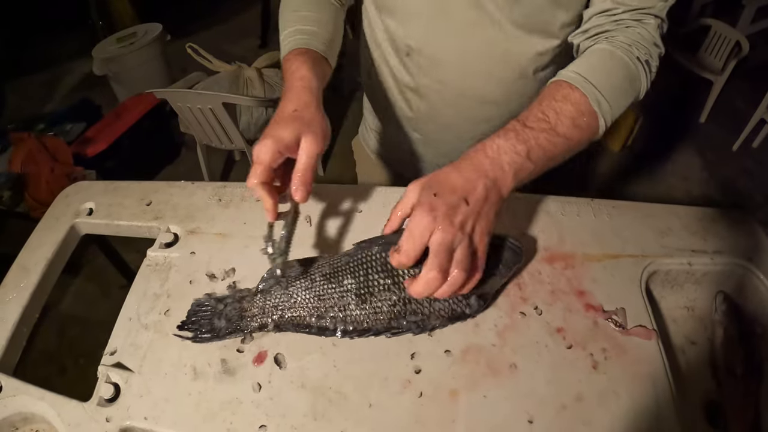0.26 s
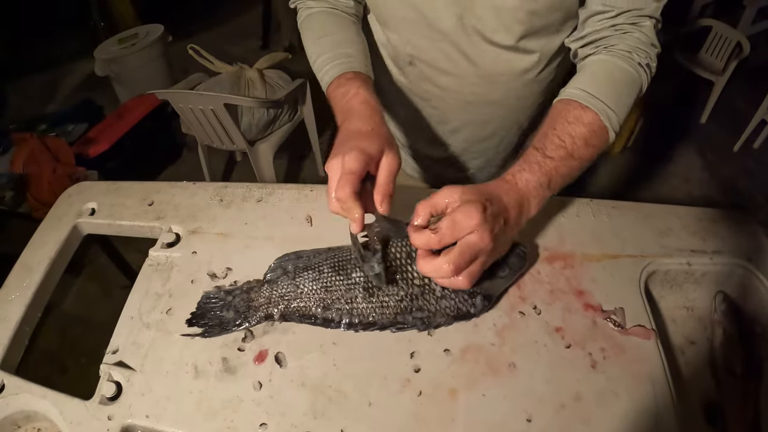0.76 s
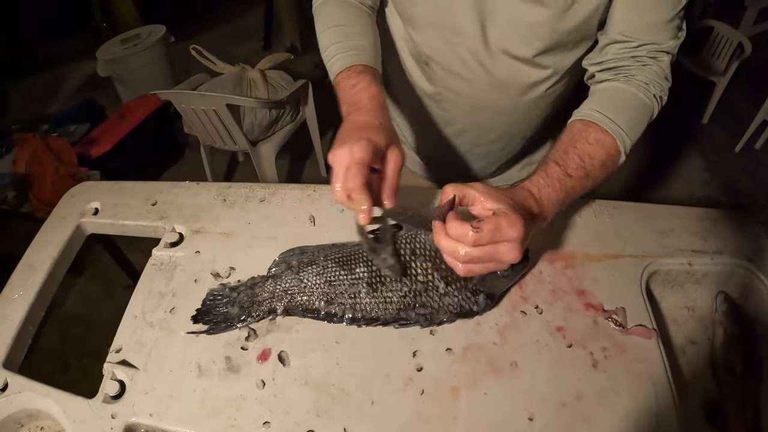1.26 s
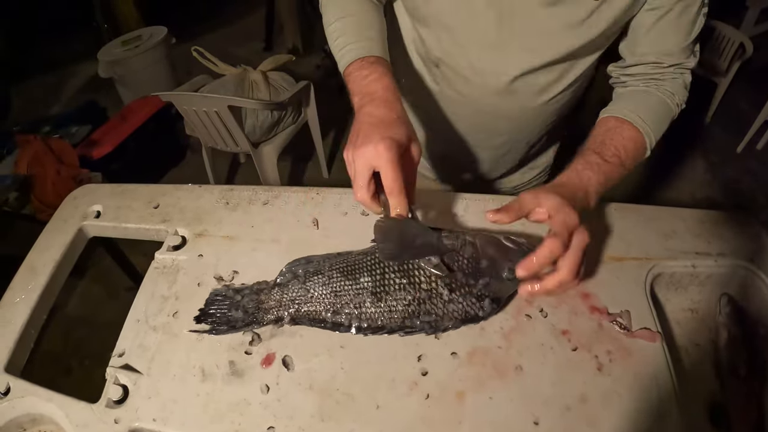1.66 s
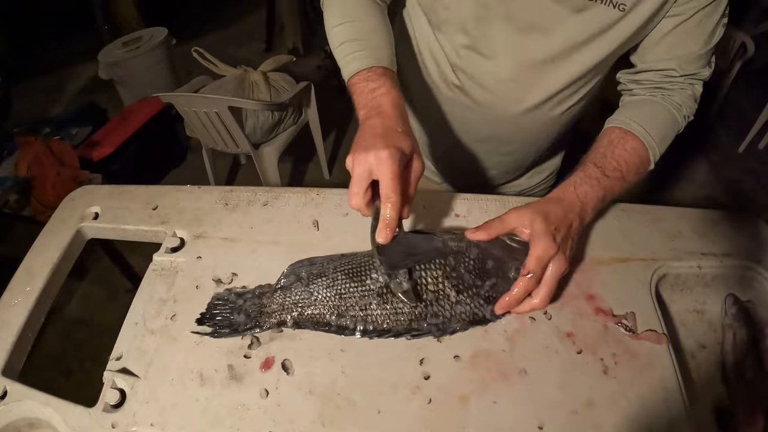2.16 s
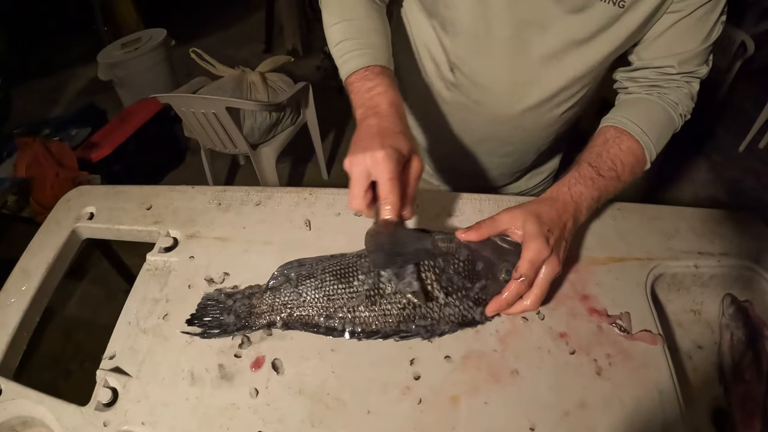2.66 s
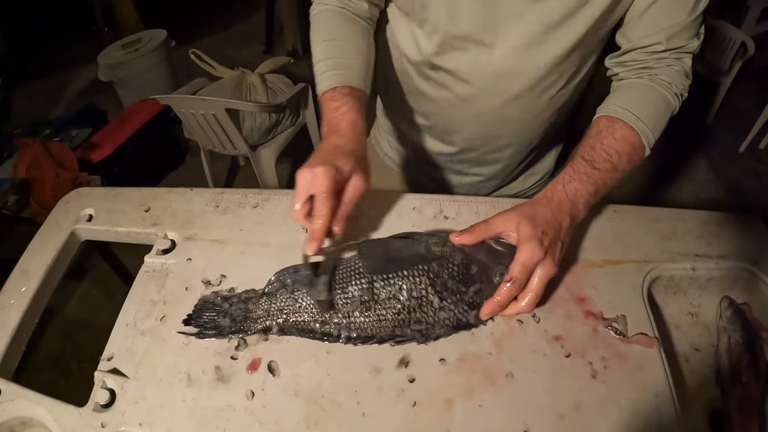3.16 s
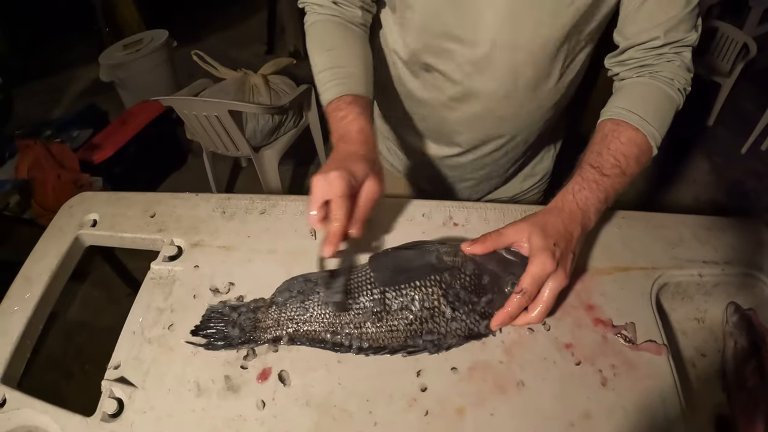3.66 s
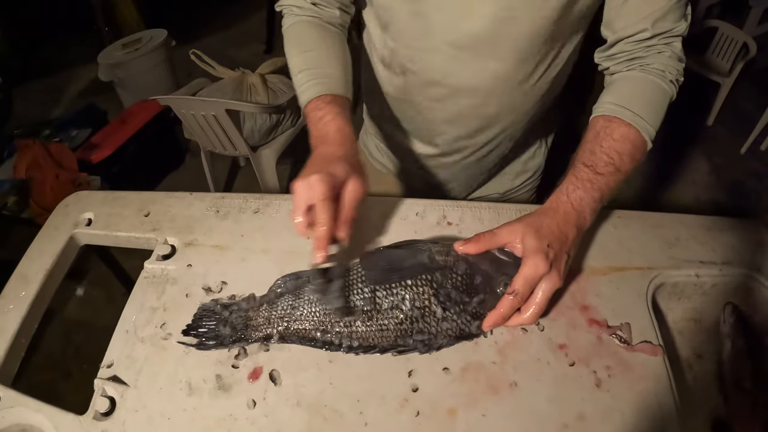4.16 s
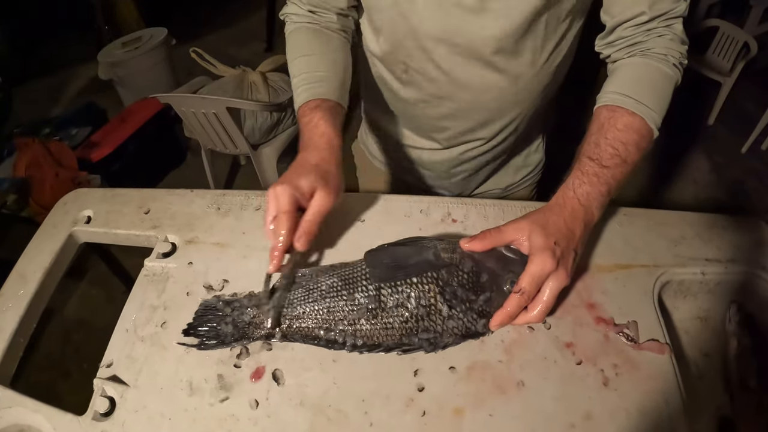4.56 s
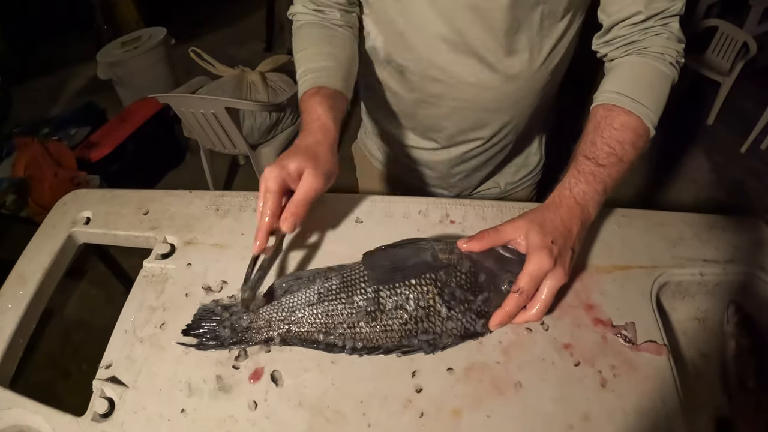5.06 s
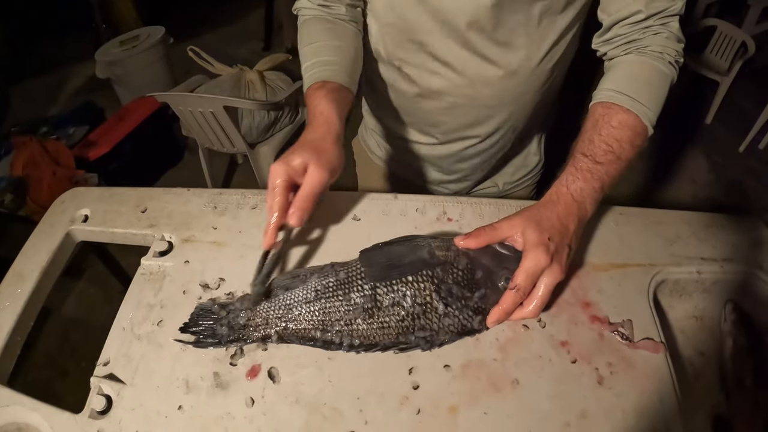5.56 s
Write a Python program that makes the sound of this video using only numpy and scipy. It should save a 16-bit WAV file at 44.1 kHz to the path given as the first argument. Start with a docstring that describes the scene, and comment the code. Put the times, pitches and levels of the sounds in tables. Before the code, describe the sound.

Close, gritty, ringing scrapes with clicking scales and hollow table thumps, sparse at first, then rapid back-and-forth, ending in separate harder strokes over a faint night hum.

```python
"""Rasping strokes to and fro: a toothed metal scaler rubs a fish on a hollow plastic table, close by, at night.
Friction grit rings the scaler's modes, scales snap loose in short clicks, and fine spray hisses over it.
Each stroke also drums the table through low and panel modes, with short reflections from table and clutter.
Behind lie a low hum that swells with the strokes, faint hiss and thin whistling bands of noise."""
import sys
import numpy as np
from scipy import signal
from scipy.fft import rfft, irfft, next_fast_len
from scipy.io import wavfile
from scipy.ndimage import uniform_filter1d

SR = 44100
rng = np.random.default_rng(int(sys.argv[2]) if len(sys.argv) > 2 else 0)


def store_pcm(level_fs):
    """Save levels as 16-bit WAV."""
    pcm = np.round(np.clip(level_fs, -1, 1) * 32767).astype(np.int16)
    wavfile.write(sys.argv[1], SR, np.atleast_2d(pcm).T)


def how_loud(loudness_db):
    """Turn decibels into a plain amplitude multiplier (0 dB gives 1, 20 dB gives 10)."""
    steps = np.asarray(loudness_db, float) / 20
    return 10 ** steps


N = 256662  # length [samples]
TIGHT_HZ = 2146  # a lowest scaler mode above this means a tight grip


def evened(x):
    """Scales to rms 1."""
    return x / np.sqrt(np.mean(x ** 2) + 1e-20)


def read(points, hz):
    """Reads a spectrum table on a log-frequency axis."""
    f, value = np.transpose(points)
    return np.interp(np.log(hz + 1), np.log(f + 1), value)


def filtered(x, order, edge_hz, kind):
    """Butterworth filter, run forward in time."""
    return signal.sosfilt(signal.butter(order, edge_hz, kind, fs=SR, output="sos"), x)


def wander(rate):
    """Slow random curve of rms about 1, with the given number of new values per second."""
    steps = int(N / SR * rate) + 2
    return np.interp(np.arange(N), np.linspace(0, N, steps), rng.standard_normal(steps)) * 1.22


def grit(per_s, spread_db):
    """Random clicks of either sign, most small and a few large, rms 1."""
    hit, size, sign = rng.random((3, N))
    height = how_loud(-spread_db * np.log(size + .004))
    return evened((hit < per_s / SR) * height * np.sign(sign - .5))


def resonate(x, hz, width):
    """A resonance of gain 1 that follows the curve hz: shift down to zero, smooth, shift back up."""
    turn = np.exp(2j * np.pi * np.cumsum(hz * np.ones(len(x))) / SR)
    r = np.exp(-np.pi * abs(width) / SR)
    return 2 * (turn * signal.lfilter([1 - r], [1, -r], x / turn)).real


def ring(x, modes, shifting_db=0., drift=0., favoured_hz=None, focus_db=0.):
    """Sum of modes, neighbours in opposite phase; each swells and drifts as the point of contact moves."""
    out = 0
    for k, (hz, width, db) in enumerate(modes):
        contact_db = shifting_db * wander(22)
        if favoured_hz is not None:  # modes near the favoured pitch are excited best
            contact_db += focus_db * np.exp(-(np.log(hz / favoured_hz) / 0.052) ** 2)
        moving_hz = hz * (1 + drift * wander(9))
        out = out + (-1) ** k * how_loud(db) * resonate(x * how_loud(contact_db), moving_hz, width)
    return out


def colour(points):
    """Causal (minimum-phase) click with the given spectrum."""
    log_gain = np.log(how_loud(read(points, abs(np.fft.fftfreq(2048, 1 / SR)))))
    return np.fft.ifft(np.exp(np.conj(signal.hilbert(log_gain)))).real[:512]


def stroke(t, row, manner):
    """All controls of one stroke: quick rise, sloping hold, fall and trail; the table is jolted on the way."""
    start, length, first_db, last_db, grip_hz, middle_db, upper_db, jolt_db = row
    ends, swell_db, push_at, knock_at, rise_db_per_s, knock_db = manner
    fall_db_per_s, trail_db, trail_db_per_s = 854, -9.5, 258  # a quick fall, then a slower trail
    relax = 0.65  # share of the tight grip that is let go by the end
    push_s, push_depth_db, knock_s, knock_depth_db = 0.049, -10.5, 0.03, -12.5  # jolt widths, drop away from them
    shallow_db_per_hz = -0.0289  # a tight grip bites less

    u = np.clip((t - start) / length, 0, 1)  # share of the stroke done
    past = np.maximum(t - start - length, 0)
    fall_db = np.maximum(-fall_db_per_s * past, np.minimum(trail_db - trail_db_per_s * past, 0))
    pressure_db = first_db + (last_db - first_db) * u + swell_db * np.sin(np.pi * u)
    pressure_db = pressure_db - rise_db_per_s * np.maximum(start - t, 0) + fall_db
    body_db, body_hz, teeth_db, teeth_hz, bite_db, spray_db = (a + (b - a) * u for a, b in ends)

    # outside the stroke the jolts weaken by half as many dB as the pressure
    weaker_db = np.minimum(pressure_db - min(first_db, last_db), 0) / 2
    off_push = 1 - np.exp(-((t - start - push_at * length) / push_s) ** 2)
    off_knock = 1 - np.exp(-((t - start - knock_at * length) / knock_s) ** 2)
    push_db = jolt_db + weaker_db + push_depth_db * off_push
    knock_db = jolt_db + weaker_db + knock_db + knock_depth_db * off_knock

    tight_hz = max(grip_hz - TIGHT_HZ, 0)
    return (pressure_db, grip_hz - relax * u * tight_hz, middle_db + body_db, body_hz, upper_db + teeth_db,
            teeth_hz, bite_db + shallow_db_per_hz * tight_hz, spray_db, push_db, knock_db)


def stroke_controls():
    """The hand: at every moment the stroke of greatest pressure sets all controls, smoothed over 5 ms."""
    # strokes of the scaler, all four tables: (start [s], length [s], pressure at start [dB], at end [dB],
    # lowest scaler mode [Hz], middle modes [dB], upper modes [dB], jolt of the table [dB])
    # against the lie of the scales
    against = [(0.0, 0.075, -18, -27, 2010, -3, -11, -28), (2.305, 0.06, -25, -20, 2060, -2.5, -7, -26.5),
               (2.6, 0.062, -19.5, -25.5, 2090, -0.5, -6, -25), (2.8, 0.06, -21, -24, 2050, -1.5, -8, -23),
               (3.09, 0.092, -23.5, -21.5, 2130, -0.5, -2.5, -23.5),
               (3.355, 0.089, -24, -22.5, 2090, -1.5, -4.5, -20.5),
               (3.578, 0.067, -27.5, -18.5, 2120, 2, -2.5, -21),
               (3.81, 0.061, -22.5, -24.5, 2080, 2, -3.5, -22),
               (4.037, .056, -20, -20, 2120, -2, -4, -26.5),
               (4.268, 0.075, -20.5, -20.5, 2060, -5, -5, -28.5),
               (4.387, 0.061, -31, -20.5, 2070, -2, -6.5, -33.5)]
    # single strokes that land hard, the scaler lifted back through the air in between
    lifted = [(4.732, 0.072, -12.5, -19.5, 2236, -3.5, -9.5, -24.5),
              (4.997, 0.096, -14, -24, 2320, -11.5, -11.5, -28.5),
              (5.268, 0.079, -13.5, -17.5, 2308, -14.5, -10.5, -28),
              (5.508, 0.1, -13, -24.5, 2250, -11.5, -10, -29.5),
              (5.778, 0.06, -20, -15.5, 2270, -17.5, -10.5, -28.5)]
    # strokes gliding back
    back = [(.135, 0.029, -21.5, -22.5, 2040, -5.5, -14, -41.5),
            (2.445, 0.087, -30.5, -27, 2090, 0.5, -10.5, -36.5),
            (2.71, 0.054, -27.5, -19.5, 2050, -1, -12, -31),
            (2.932, .12, -17.5, -24.5, 2107, -8.5, -8.5, -29),
            (3.235, 0.074, -15, -18, 2065, -2.5, -6.5, -27),
            (3.488, 0.057, -15.5, -18.5, 2100, -5.5, -3, -28.5),
            (3.7, 0.061, -17, -18, 2140, -2.5, -2, -27), (3.914, 0.08, -18.5, -24.5, 2066, -0.5, -4, -28.5),
            (4.148, 0.077, -16, -24.5, 2110, -5.5, -2.5, -31),
            (4.505, 0.082, -17, -21, 2090, -2.5, -2.5, -28.5),
            (4.59, 0.091, -32, -27, 2120, -6.5, -10.5, -35.5)]
    # light scuffs while the scaler rests or finds its place
    scuffs = [(.19, 0.11, -42, -49, 2010, -8, -13, -45), (.73, 0.06, -59, -49, 2100, 1, -4, -66),
              (.8, 0.021, -43, -37, 2040, -8, -5, -60), (.862, 0.0079, -32, -30, 2060, -4, -9, -47),
              (1.002, 0.2, -42.5, -34.5, 2150, -4.5, -8.5, -54),
              (1.27, 0.039, -37, -32.5, 2190, -9, -1.5, -43),
              (1.358, 0.0099, -14, -26, 2210, -10, -11, -43),
              (1.439, 0.011, -30, -32, 2150, -10.5, -6, -35), (1.472, 0.019, -31.5, -33.5, 2090, 7, 7, -29),
              (1.52, 0.13, -48, -40, 2000, 3, -9, -39.5), (1.6, 0.023, -34.5, -39, 2200, 3, -1, -40),
              (1.638, .016, -24, -22, 2220, -3.5, -12, -33), (1.768, 0.076, -46, -47, 2050, -8, -4.5, -42),
              (1.848, .15, -42, -28, 2050, 3.5, -4.5, -36), (2.05, 0.023, -41, -49, 2100, 3, -8, -40),
              (2.082, 0.022, -23, -24, 2090, 2.5, -6.5, -32)]
    # how each kind of stroke runs, by name: ([six (start, end) pairs: change of middle modes [dB], favoured
    # middle pitch [Hz], change of upper modes [dB], favoured upper pitch [Hz], bite into the scales [dB],
    # fine spray [dB]], swell of pressure mid-stroke [dB], peak of push [share of length],
    # peak of knock [share of length], rise before the start [dB/s], knock relative to push [dB])
    manners = {"against": ([(-1.2, 0.9), (3298, 3100), (2.5, -2.5), (5551.5, 5500), (-12, -14), (0, 1)],
               1.37, 0.94, 0.79, 1010, -6.5), "lifted": ([(-4.5, 2), (3102, 3002), (-2, 1.5), (5550, 5600),
               (-12.5, -11), (-10, -10)], 2.5, 0.48, .2, 1460, -2.5), "back": ([(1.7, -2.5), (3235, 3167),
               (-1.5, 0), (5330, 5378), (-24, -17.5), (-5, 0)], 3.3, 0.36, 0.15, 740, -3.5),
               "scuff": ([(-0.5, -1.2), (3450, 3550), (2, -0.3), (5420, 5384), (-17.5, -22), (0, -2)],
               1.2, .75, 0.63, 1600, -5)}
    t = np.arange(0, N / SR + .002, .001)
    kinds = (against, "against"), (lifted, "lifted"), (back, "back"), (scuffs, "scuff")
    each = np.array([stroke(t, row, manners[name]) for rows, name in kinds for row in rows])
    strongest = each[:, :1].argmax(0)[None]
    now = np.take_along_axis(each, strongest, 0)[0]
    return [np.interp(np.arange(N) / SR, t, c) for c in uniform_filter1d(now, size=5, axis=1)]


def slips(per_s, fade_s):
    """Catch and release: sudden rises that fade, rms 1."""
    return evened(signal.lfilter([1], [1, -np.exp(-1 / (abs(fade_s) * SR))], abs(grit(per_s, 1.83))))


def crack(hz, turn, cycles=0.62):
    """A scale lets go: a cycle or two with a soft edge, peak near 1."""
    u = np.arange(160) / SR * hz / cycles
    return np.e * u * np.exp(-u) * np.sin(2 * np.pi * (u * cycles + turn))


def snaps(catch_db):
    """Loud snaps and touches, and lesser snaps at random times, louder where the teeth catch; all kick the tool."""
    # the loudest scales snapping off: (time [s], crack level [dB], centre [Hz])
    loud_snaps = [(.022, -8, 3650), (.0255, -4, 5090), (.0304, -4.5, 5000), (.053, -2.5, 4770),
                  (.0626, -13, 3950), (.8133, -24, 4950), (1.3576, -7.5, 4980), (1.364, -8, 4130),
                  (1.485, -8.5, 6100), (1.766, -14.5, 6570), (2.0817, -9.5, 3580), (2.1002, -9, 3680),
                  (2.1046, -4.5, 3470), (2.33, -9.5, 3880), (2.3591, -6, 3000), (2.3695, -8, 3900),
                  (2.3737, 0, 7350), (2.5986, -3.5, 3200), (2.611, -12, 5190), (2.6293, -8, 3350),
                  (2.6505, -6, 3820), (2.6644, -3, 6150), (2.8035, -1, 3280), (2.816, -15, 3570),
                  (2.8324, -0.5, 3430), (2.8542, -8.5, 5700), (2.9693, -5, 3070), (2.984, -8, 5500),
                  (3.1042, 0, 5520), (3.1465, -3, 3780), (3.188, -6, 3350), (3.3753, 1, 4770),
                  (3.3943, -5.5, 5200), (3.4203, 0, 3300), (3.4355, -7, 3240), (3.5957, -2, 5330),
                  (3.607, -9, 4950), (3.631, -7, 3640), (3.651, -4.5, 3360), (3.7361, -7, 4400),
                  (3.8043, -10, 4160), (3.809, -4, 4230), (3.814, -13, 4040), (3.8309, -8, 3470),
                  (3.8385, -3, 5000), (4.0334, -3, 5070), (4.0507, -7, 4500), (4.0615, -6, 4700),
                  (4.0851, -4, 3600), (4.276, -4, 3580), (4.284, -3.5, 3940), (4.3183, -2.5, 5560),
                  (4.3368, -4, 6060), (4.5626, -2.5, 5940), (4.58, -5.5, 5330), (4.7312, -13, 3180),
                  (4.756, -7.5, 4300), (5.0102, -1.5, 4000), (5.024, -4, 4630), (5.086, -1, 7900),
                  (5.0953, -3, 6460), (5.2815, 0.5, 4460), (5.2968, -7.5, 4900), (5.3098, -3.5, 5250),
                  (5.346, -7, 4880), (5.518, -8, 5860), (5.5343, -13, 4670), (5.5553, -6, 5180),
                  (5.566, -8.5, 5430), (5.793, -7.5, 5780)]
    # the scaler touching down and stray ticks in the pauses:
    # (time [s], crack level [dB], centre [Hz], kick to the tool relative to the crack [dB])
    touches = [(0.3344, -43, 3340, 8.5), (0.375, -41, 4840, 4), (0.5744, -36, 5560, -5),
               (0.7257, -43, 3120, 1), (0.7761, -32.5, 5360, -1), (0.8614, -20.5, 5070, -1.5),
               (1.2625, -30.5, 5430, -8), (1.439, -20, 5300, 7), (1.4712, -17, 5170, -9.5),
               (1.642, -8, 2960, -3.5), (2.298, -22, 3040, -8), (3.0887, -15, 4000, -3),
               (3.2264, -13, 3390, -10), (3.485, -17, 3200, -2.5), (3.576, -23, 5540, -1),
               (4.4254, -12, 3170, 6.5), (4.996, -15.5, 4150, 7), (5.234, -29, 7610, 2),
               (5.476, -44, 3510, -2), (5.503, -21, 5700, 1), (5.687, -32, 4170, 0), (5.7399, -38, 3120, 7),
               (5.7763, -13, 5990, 4.5)]
    snap_ring_db = -17.5  # kick of a snap to the tool, relative to its crack
    lesser_count, low_hz, high_hz = 170, 3300, 5500
    lesser_db, lesser_spread_db = 21, -10  # level over the catch, range of random softening

    when, size, pitch = rng.random((lesser_count, 3)).T
    when = when * (N - 1) / SR
    level_db = catch_db[(when * SR).astype(int)] + lesser_db + lesser_spread_db * size
    lesser = zip(when, level_db, low_hz * (high_hz / low_hz) ** pitch)
    rows = [(*row, snap_ring_db) for row in (*loud_snaps, *lesser)] + touches

    cracks, kicks = np.zeros(N + 160), np.zeros(N)
    for (s, db, hz, ring_db), turn in zip(rows, rng.random(len(rows))):
        at = round(s * SR)
        cracks[at:at + 160] += how_loud(db) * crack(hz, turn, cycles=.7)
        kicks[at] += how_loud(db + ring_db) * 30
    return cracks[:N], kicks


def crackle():
    """Countless small scales of different size, each size its own sparse train of cracks."""
    # spectrum of the crackling scales: (frequency [Hz], relative level [dB])
    scale_colour = [(410, -40.5), (700, -9), (1220, -19), (2080, -3.5), (2340, -2.5), (2840, -12),
                    (5650, -10), (7620, -10), (12200, -16), (15600, -43)]
    trains = 0
    for hz in np.geomspace(1500, 13000, 9):
        trains = trains + signal.oaconvolve(grit(700, 3.53), evened(crack(hz, rng.random())))[:N]
    return evened(signal.oaconvolve(trains, colour(scale_colour))[:N])


def scaler(pressure_db, grip_hz, body_db, body_hz, teeth_db, teeth_hz, bite_db, spray_db):
    """Teeth catch and slip over the scale rows: grit rings the tool, the scales crackle, wet skin hisses."""
    # lowest scaler modes: (factor on the grip pitch [ratio], width [Hz], relative level [dB])
    grip_modes = [(.87, 85.3, -4), (1.001, 108.7, 0.5), (1.12, 117.5, -18)]
    # middle scaler modes: (frequency [Hz], width [Hz], relative level [dB])
    body_modes = [(2700, 175, -7), (3124, 80, -5), (3340, 113, -6.5), (3580, 76, -7.5), (3880, 107, -8)]
    # upper scaler modes: (frequency [Hz], width [Hz], relative level [dB])
    teeth_modes = [(4970, 118, -5), (5350, 113, -6.5), (5560, 120, -8), (5925, 110, -10), (6240, 110, -7.5),
                   (6576, 103, -6), (7520, 160, -12), (8000, 79, -27.5), (9450, 620, -17.5)]
    lone_db_per_hz = -0.043  # a tight grip mutes the neighbours of the lowest mode

    cracks, kicks = snaps(pressure_db + bite_db)
    catch = np.clip(how_loud(0.38 * (bite_db + 8)), .2, 1.5)  # a deep bite catches hard, the return stroke glides
    stutter = how_loud(pressure_db) * (0.59 + catch * slips(260, 0.0023)) / np.sqrt(1.0 + catch ** 2)

    def rub():
        """Each group of modes is driven mostly by the teeth nearest to it."""
        return how_loud(13.5) * stutter * how_loud(2.0 * wander(120)) * grit(7000, 3.2) + kicks

    drive = rub()
    muted_db = lone_db_per_hz * np.maximum(grip_hz - TIGHT_HZ, 0)
    grip = 0
    for k, (factor, width, db) in enumerate(grip_modes):
        level = how_loud(db + muted_db * (k != 1))  # the middle one is never muted
        grip = grip + (-1) ** k * level * resonate(drive * how_loud(2.46 * wander(22)), grip_hz * factor, width)
    body = how_loud(body_db + 3) * ring(rub(), body_modes, shifting_db=3.0, drift=0.014,
                                   favoured_hz=body_hz, focus_db=5.0)
    teeth = how_loud(teeth_db + 1.0) * ring(rub(), teeth_modes, shifting_db=4.0, drift=0.027,
                                       favoured_hz=teeth_hz, focus_db=6.5)
    ringing = filtered(grip + body + teeth + cracks, 2, [1500, 9500], "bandpass")

    # the finest spray comes from all along the teeth, so each ear hears its own
    spray = filtered([grit(5000, 3.0), grit(5000, 3.0)], 2, [8500, 14500], "bandpass")
    spray = spray * stutter * how_loud(spray_db + np.array([[-17], [-21]]))  # left, right
    edge = how_loud(5.5) * filtered(cracks, 2, 12800, "highpass")  # sharp top of each snap
    return ringing + edge + crackle() * stutter * how_loud(bite_db + 8.5), spray


def table(push_db, knock_db):
    """The fish is jolted against the hollow top: soft pushes drum it low, harder knocks ring its panels."""
    # low modes of the hollow top: (frequency [Hz], width [Hz], relative level [dB])
    table_modes = [(103, 38, -10.5), (126, 14, -2), (182.8, 22, 0.5), (241, 39.7, -2.5), (306, 69.4, -7.5)]
    # panel modes of the table: (frequency [Hz], width [Hz], relative level [dB])
    knock_modes = [(402, 38, 0), (582, 45, -2.5), (730, 41, -8), (982, 58, -5), (1340, 60, -13.5)]
    drum = how_loud(25.0) * ring(grit(500, 3.7) * how_loud(push_db), table_modes)
    knocks = how_loud(21.5) * ring(grit(500, 3.15) * how_loud(knock_db), knock_modes, shifting_db=2.5)
    return drum + knocks


def night(pressure_db):
    """Faint hiss and a low hum that swells with the strokes, from random short-time spectra."""
    # spectrum of the night: (frequency [Hz], relative level [dB])
    night_colour = [(15, -67), (25, -81), (128, 1), (191, -16), (231, -12.5), (309, -17.5), (709, -27),
                    (769, -29.5), (879, -29.5), (1310, -24.5), (1580, -30.5), (1960, -26.5), (2240, -33.5),
                    (4500, -40), (15000, -68)]
    # likeness of the two ears: (frequency [Hz], correlation [-1 to 1])
    night_same = [(60, 1), (240, 0.96), (950, 0.69), (3770, 0.22), (15000, 0.72)]
    # slow course of the hum before the strokes swell it: (time [s], level [dB])
    hum_course = [(0, -31), (.3, -32.5), (.45, -40.5), (.9, -33), (1.15, -34.5), (1.4, -27.5), (1.75, -35),
                  (2.2, -29), (2.75, -28.5), (3.5, -32.5), (4.1, -33), (4.6, -29.5), (5.2, -33),
                  (5.82, -33.5)]
    bed_db = -36  # rms of hiss and hum before the hum is shaped
    hum_follows, quiet_db, smooth_s = 0.26, -38, .03  # the hum takes this share of pressure above quiet_db

    frames, hz = N // 256 + 5, np.fft.rfftfreq(1024, 1 / SR)
    a, b, c, d = rng.standard_normal((frames, 513, 4)).T
    same = np.clip(read(night_same, hz), -1, 1)[:, None]
    left = a + 1j * b
    right = same * left + np.sqrt(1 - same ** 2) * (c + 1j * d)
    spectra = np.array([left, right]) * how_loud(read(night_colour, hz))[:, None]
    bed = how_loud(bed_db) * evened(signal.istft(spectra, nperseg=1024, noverlap=768)[1][:, :N])

    low = signal.sosfiltfilt(signal.butter(2, 170, fs=SR, output="sos"), bed)
    swell_db = np.interp(np.arange(N) / SR, *np.transpose(hum_course)) - bed_db
    excess_db = np.maximum(pressure_db - quiet_db, 0)
    swell_db += hum_follows * uniform_filter1d(excess_db, round(smooth_s * SR))
    return bed - low + low * how_loud(swell_db)


def whistles():
    """Narrow bands of noise, each resonated twice, unrelated in each ear."""
    # faint steady whistling bands in the night: (frequency [Hz], width of each resonance [Hz], rms level [dB])
    bands = [(1960, 150, -62), (4510, 70, -71), (7450, 220, -79)]
    ears = np.zeros((2, N))
    for ear in ears:
        for hz, width, db in bands:
            noise = rng.standard_normal(N)
            ear += how_loud(db) * evened(resonate(resonate(noise, hz, width), hz, width))
    return ears


def reflections(x, t60=0.15):
    """Sparse reflections of random sign from table and clutter, other ones in each ear; treble scatters most."""
    taps = np.zeros((2, 12000))
    at = np.arange(40, 11940, 20) + rng.integers(0, 20, (2, 595))
    np.put_along_axis(taps, at, rng.choice([-1., 1.], at.shape), 1)
    decay = how_loud(-60 * np.arange(12000) / SR / t60)
    taps = signal.lfilter([1, -.6], [1], taps * decay)
    return signal.oaconvolve(x[None], taps / np.linalg.norm(taps[0]), axes=1)[:, :N]


def microphone_ports(x):
    """Two close microphone ports hear one source with a small shift of phase and level."""
    # phase between the ports: (frequency [Hz], lead of left [rad])
    lead = [(300, 0), (1100, -.25), (2000, -.35), (3300, -.62), (5500, -.48), (9000, -.35), (13000, -.1)]
    # level between the ports: (frequency [Hz], left over right [dB])
    tilt = [(60, 11), (180, -6.6), (550, 2), (1650, -0.5), (4970, -0.4), (15000, 1.5)]
    size = next_fast_len(N)
    hz = np.fft.rfftfreq(size, 1 / SR)
    half = how_loud(read(tilt, hz) / 2) * np.exp(.5j * read(lead, hz))
    return irfft(rfft(x, size) * np.array([half, 1 / half]), size)[:, :N]


def scene():
    """Scaler and table heard directly and by reflection, over the night."""
    *hand, push_db, knock_db = stroke_controls()
    rasp, spray = scaler(*hand)
    near = rasp + table(push_db, knock_db)
    table_echo = how_loud(-10.5) * reflections(near, t60=0.029)
    clutter_echo = how_loud(-10.5) * reflections(near, t60=0.25)
    pressure_db = hand[0]
    return microphone_ports(near) + spray + table_echo + clutter_echo + night(pressure_db) + whistles()


def roll_off(x):
    """The treble ends steeply here."""
    return signal.sosfilt(signal.butter(12, 15710, fs=SR, output="sos"), x)


def record(dry):
    """The small microphone cuts the deepest bass and the top and overloads softly."""
    heard = filtered(dry, 3, [55, 13800], "bandpass")
    mix = 1.203 * np.tanh(heard / 1.386)
    return roll_off(mix)


dry = scene()
out = record(dry)
store_pcm(out)
```